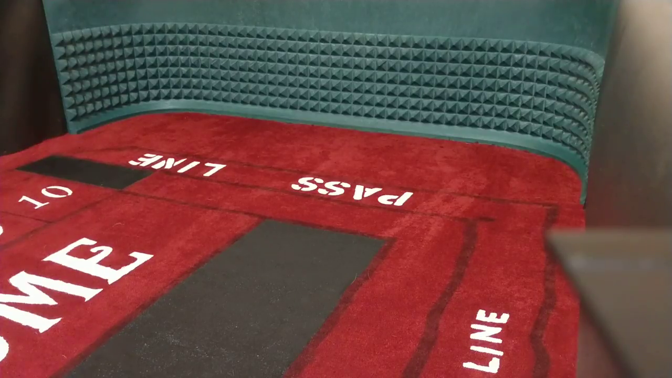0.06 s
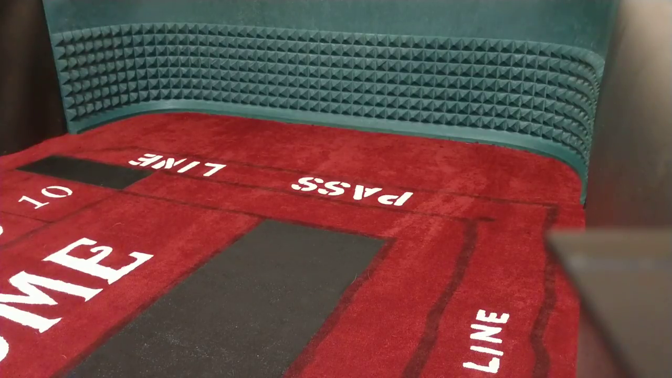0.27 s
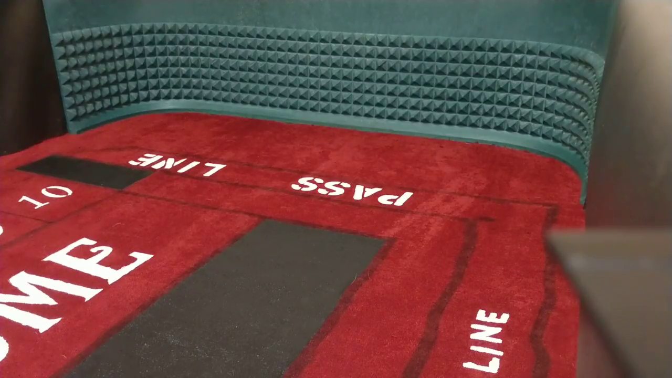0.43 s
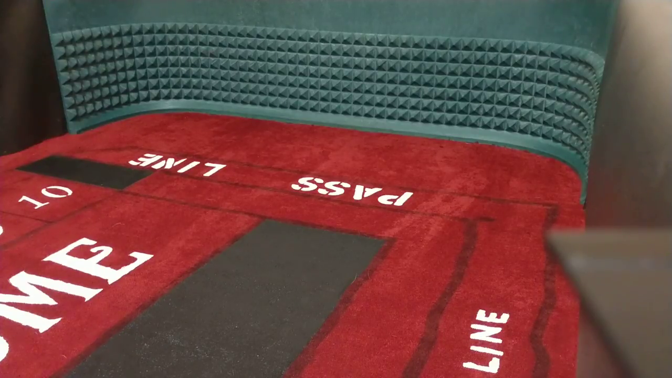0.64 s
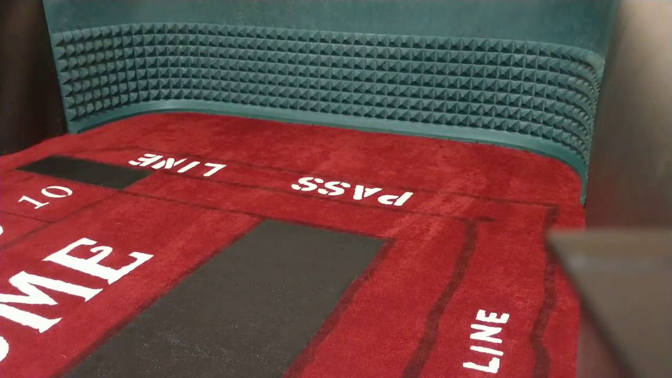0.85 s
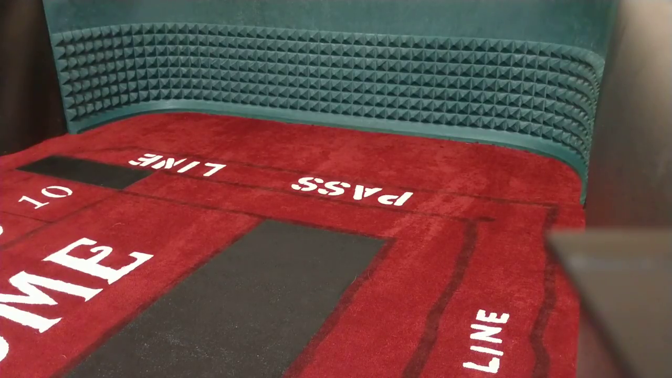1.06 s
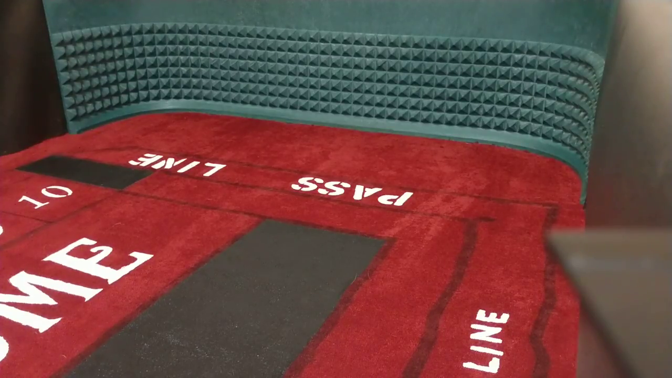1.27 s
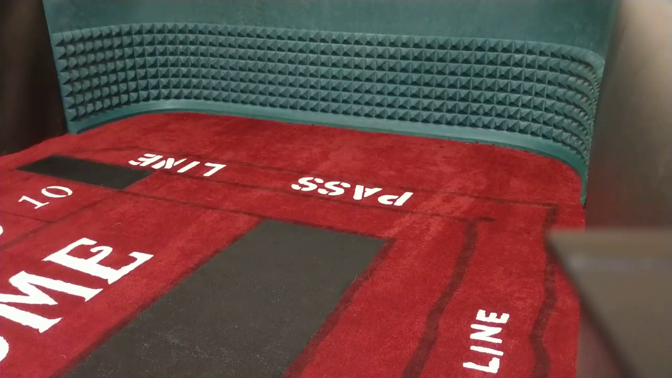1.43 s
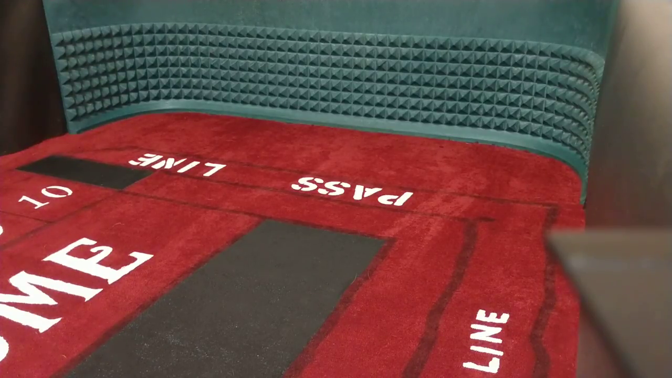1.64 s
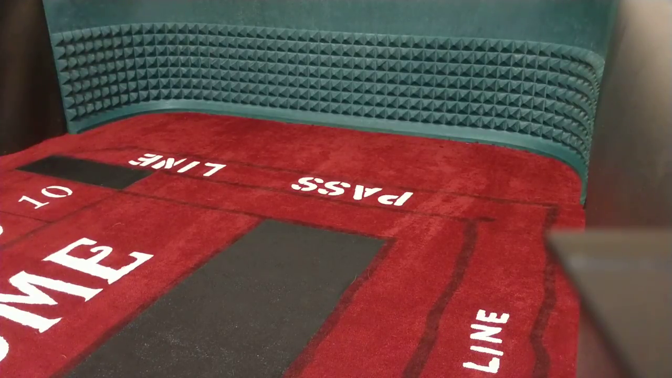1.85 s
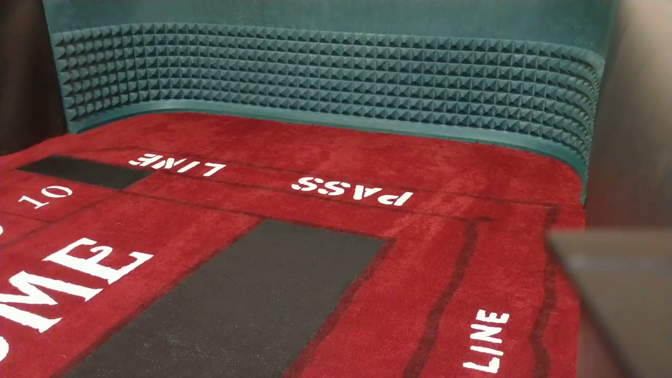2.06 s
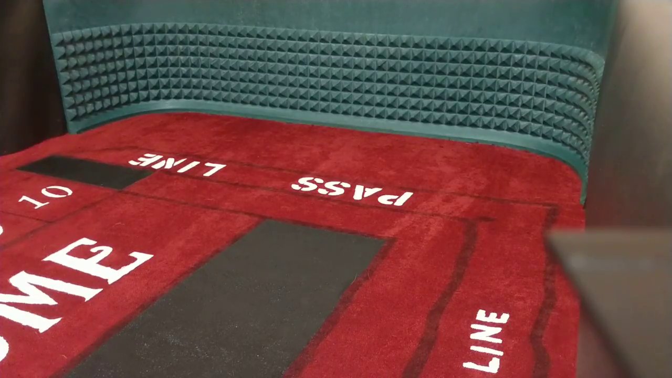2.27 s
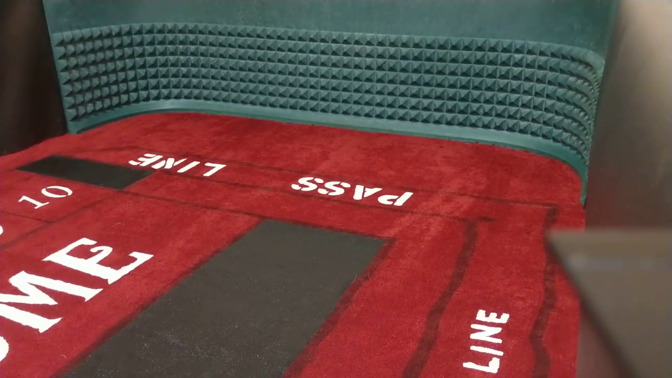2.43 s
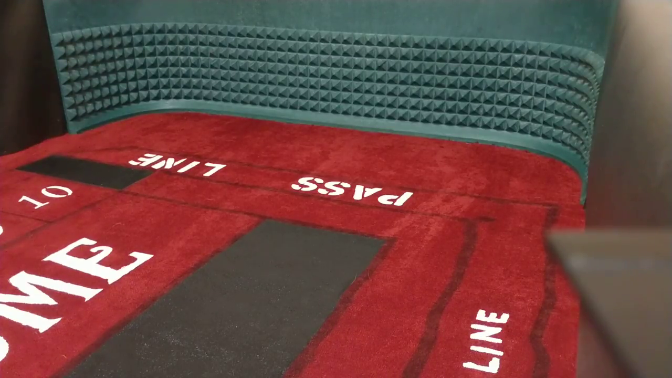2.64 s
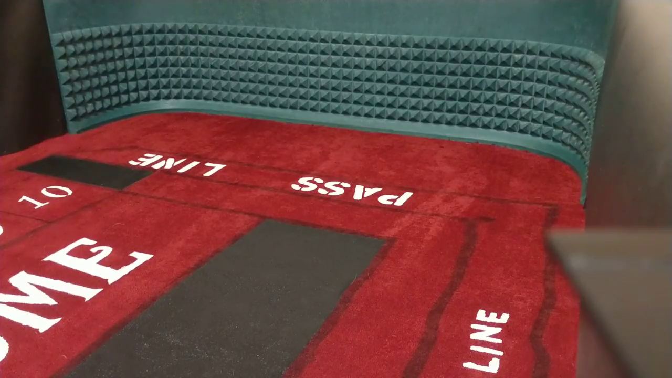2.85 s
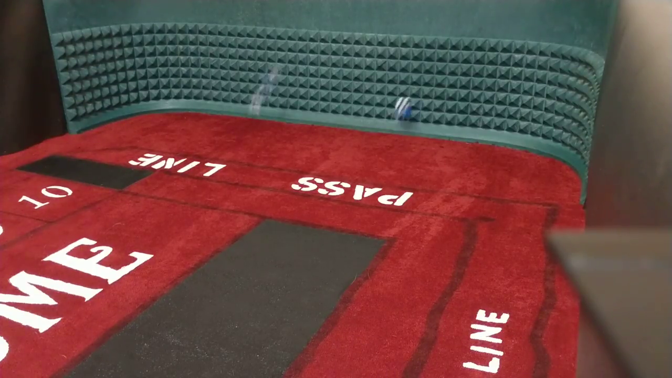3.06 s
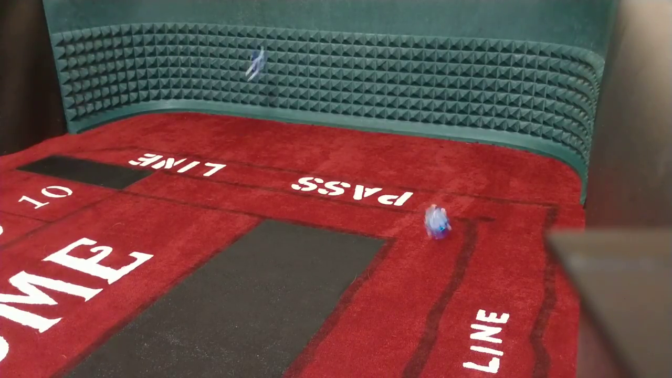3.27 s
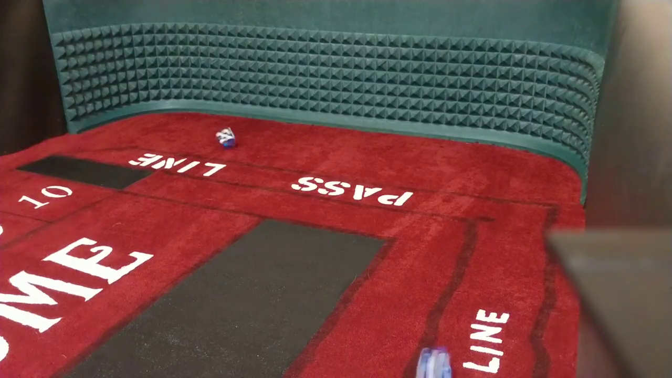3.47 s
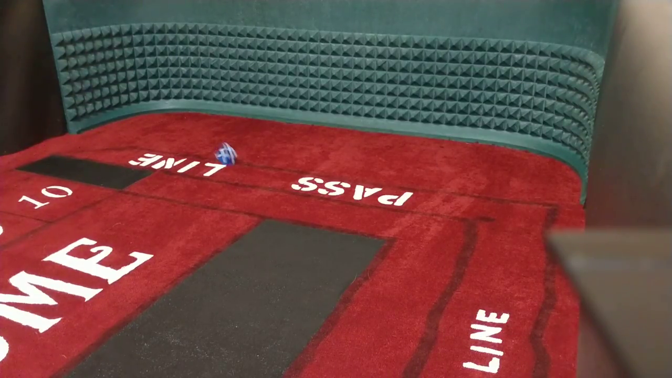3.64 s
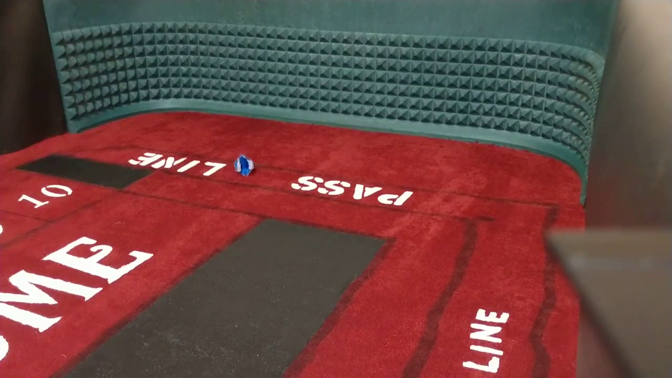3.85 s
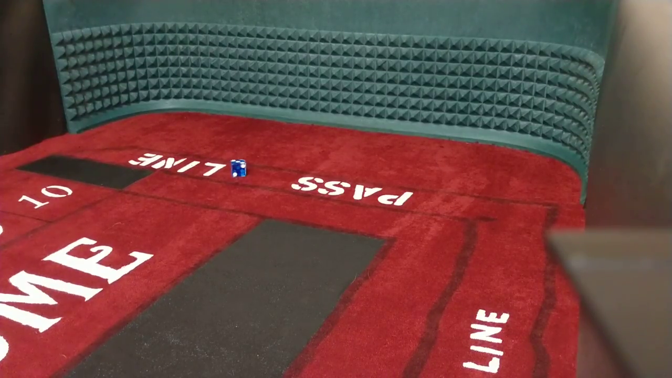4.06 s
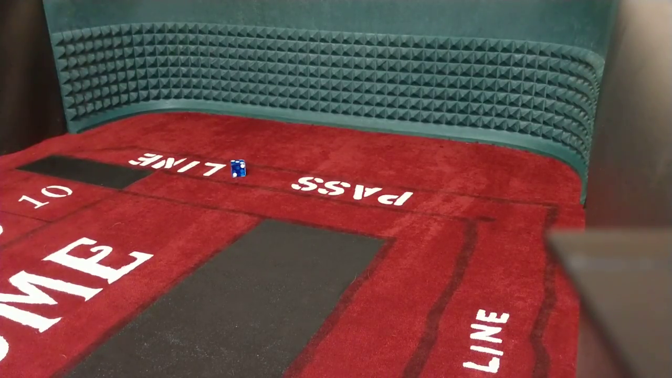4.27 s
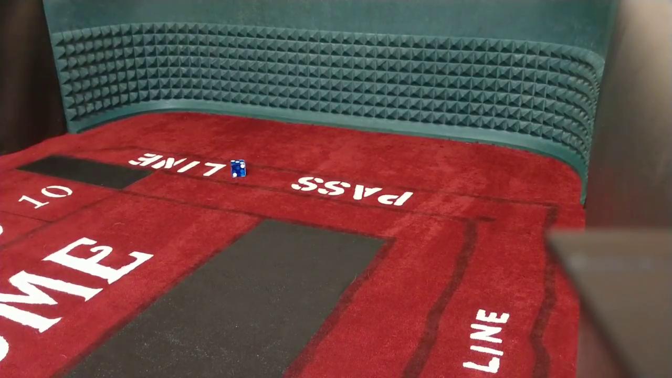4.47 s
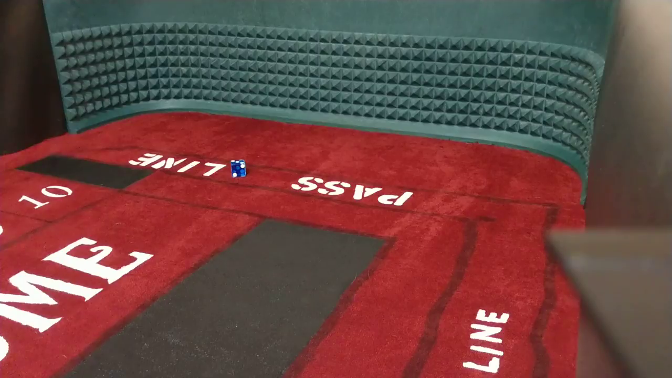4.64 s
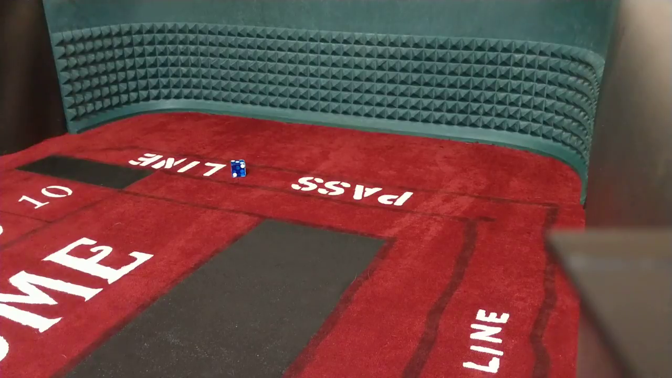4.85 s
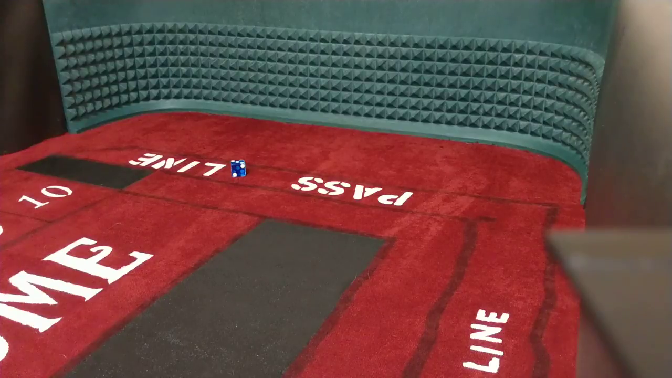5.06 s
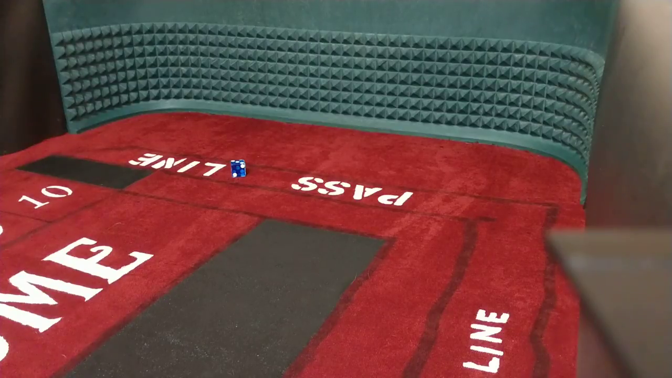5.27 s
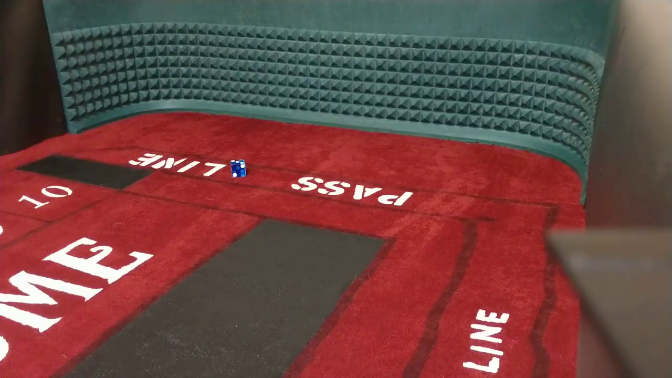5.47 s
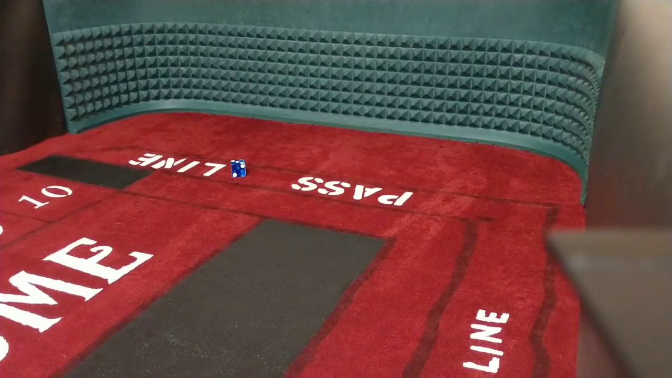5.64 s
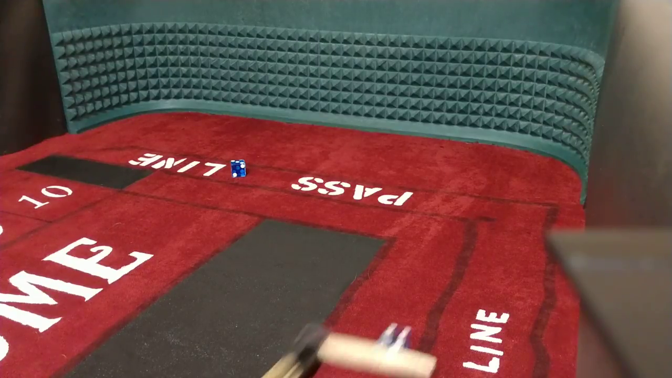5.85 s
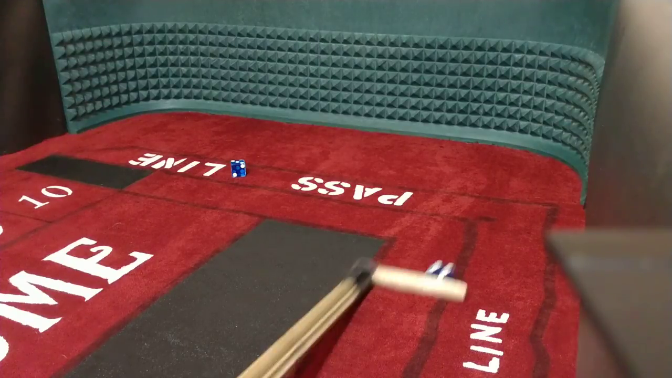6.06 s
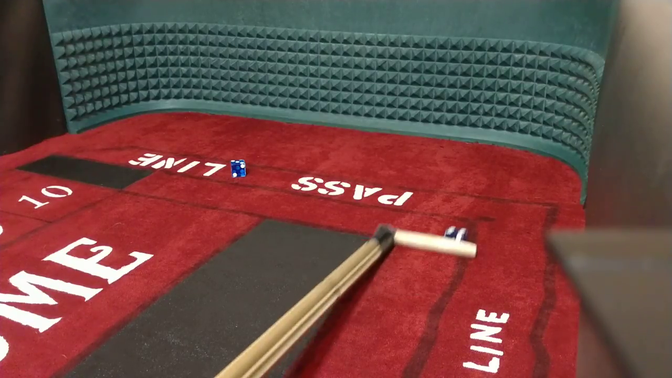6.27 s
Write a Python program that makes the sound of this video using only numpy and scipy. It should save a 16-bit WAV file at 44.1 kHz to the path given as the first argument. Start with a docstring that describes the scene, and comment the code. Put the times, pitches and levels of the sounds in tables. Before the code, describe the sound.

A quiet indoor room with steady airy ventilation, low hum and a very thin high whine. After about three seconds two dice strike a felt-covered table with a loud, hard knock, clack off the end wall and tumble in smaller, softening knocks. Soft cloth brushes follow, then a wooden stick rustles over the felt and taps a die. Close stereo microphone, impacts mostly left, short boxy echoes.

```python
"""A room with a felt-covered gaming table, heard by a close pair of microphone ports that widens the stereo.
Ventilation (shaped noise), hum and two whining picture tubes (beating sines) go on throughout; cloth is brushed.
Two dice hit the felt hard, clack off the end wall and tumble to rest: filtered pushes and ticks, board modes, echoes.
A wooden stick knocks the felt, slides out with a rustle (swelling noise) and taps a die (ringing ticks).
The first landing makes the microphone's limiter duck; it recovers slowly."""
import sys
import numpy as np
from scipy import signal
from scipy.fft import rfft, irfft
from scipy.io import wavfile
from scipy.ndimage import uniform_filter1d, minimum_filter1d

SR = 44100
rng = np.random.default_rng(int(sys.argv[2]) if len(sys.argv) > 2 else 0)


def to_wav(s):
    """Save 16-bit WAV."""
    ch = np.atleast_2d(s).T  # columns
    pcm = np.round(np.clip(ch, -1, 1) * 32767)  # PCM
    wavfile.write(sys.argv[1], SR, pcm.astype(np.int16))


N = 278094
T = np.arange(N) / SR   # s


def from_db(db):
    """Decibels to gain."""
    return 10 ** (np.asarray(db) / 20)


def in_time(rows):
    """Read a table over time: one curve per column, joined by straight lines."""
    s, *columns = np.transpose(rows)
    return np.array([np.interp(T, s, column) for column in columns])


def at_hz(points, hz):
    """Read a table on a log-frequency axis."""
    f, value = np.transpose(points)
    return np.interp(np.log(np.maximum(hz, 1)), np.log(f), value)


def cut(x, hz, kind, order=2):
    """Causal Butterworth filter."""
    return signal.sosfilt(signal.butter(order, hz, kind, fs=SR, output="sos"), x)


def late(x, samples):
    """Delay along time."""
    silence = np.zeros_like(x[..., :samples])
    return np.concatenate([silence, x[..., :x.shape[-1] - samples]], axis=-1)


def add(out, s, sound):
    """Mix a sound in at a time in seconds."""
    i = round(s * SR)
    out[i:i + len(sound)] += sound[:N - i]


def mode(t, hz, t60):
    """A struck resonance: a sine that decays by 60 dB in t60 seconds."""
    return np.sin(2 * np.pi * hz * t) * from_db(-60 * t / t60)


def drift(hz):
    """Slow chance below a cut-off, with a spread of 1."""
    slow = cut(rng.standard_normal(N + SR), hz, "low")[SR:]   # the filter settles first
    return slow / slow.std()


def swell(s, db, half_s):
    """A bell-shaped rise and fall of gain."""
    return from_db(db) * np.exp(-np.minimum(((T - s) / half_s) ** 2, 50))


def noise(spectrum, alike=0):
    """Noise at the two ports: a shared and an opposed part give the density and correlation asked for."""
    gain = from_db(at_hz(spectrum, np.fft.rfftfreq(N, 1 / SR))) * np.sqrt(SR) / 2
    mid, side = rfft(rng.standard_normal((2, N))) * gain
    shared = np.sqrt(1 + alike) * mid
    opposed = np.sqrt(1 - alike) * side * [[1], [-1]]
    return irfft(shared + opposed, N)


# ventilation in the room, before it is widened and its tone coloured: f/Hz, level/dB per Hz
AIR = [(25, -83), (50, -72.5), (85, -80.5), (135, -71.5), (170, -69), (250, -73.5), (350, -74.5),
       (700, -78.5), (1000, -88.5), (1250, -88), (1800, -99.5), (2700, -102), (4500, -109), (13000, -115)]
# likeness of that air at the two ports: f/Hz, correlation
LIKENESS = [(50, 0), (90, 0), (250, 0.52), (700, 0.4), (1800, 0), (12000, 0)]


def ventilation():
    """Steady rush of air, partly alike at the two ports."""
    return noise(AIR, at_hz(LIKENESS, np.fft.rfftfreq(N, 1 / SR)))


def tone(hz, waver):
    """A sine of rms 1 whose phase wanders (radians per root second)."""
    wander = waver * np.cumsum(rng.standard_normal(N)) / np.sqrt(SR)
    return np.sqrt(2) * np.sin(2 * np.pi * (hz * T + rng.random()) + wander)


# fan and mains hum in the room: f/Hz, left level/dB rms, right level/dB rms
HUM = [(52.5, -76, -88), (96, -78, -92), (120.6, -58.5, -79), (128.6, -60.5, -71.5), (194.1, -65.5, -63),
       (191.6, -52, -49.5), (240.6, -65, -54)]
# line whine of two picture tubes, beating: f/Hz, relative level/dB
TUBES = [(15734.2, 0), (15747.1, -4.5)]
# loudness of the whine on the left, before the level flutters: t/s, level/dB
WHINE = [(0, -49), (3.7, -51), (4.5, -47), (6.3, -48.5)]
WHINE_RIGHT_DB = -4   # right side relative to left


def appliances(flutter_db=1.5, flutter_hz=4):
    """Fans hum low; the picture tubes whine very high and beat; the level flutters slightly, more on the right."""
    hum = sum(from_db([[left_db], [right_db]]) * tone(hz, waver=2.14) for hz, left_db, right_db in HUM)
    whine = sum(from_db(db) * tone(hz, waver=0.46) for hz, db in TUBES)
    flutter = flutter_db * np.array([drift(flutter_hz) / 2, drift(flutter_hz)])
    whine_db = in_time(WHINE) + [[0], [WHINE_RIGHT_DB]] + flutter
    return hum + from_db(whine_db) * whine


# microphone hiss: f/Hz, level/dB per Hz
HISS = [(1000, -108), (12000, -106)]


def hiss():
    """The microphone's own noise, independent at the two ports."""
    return noise(HISS)


# spectrum of the swish, before it swells: f/Hz, level/dB per Hz
SWISH = [(1500, -104), (3200, -100), (4500, -100), (8000, -98), (11000, -98), (13000, -97.5), (16000, -92)]
# spectrum of the rub, before it swells: f/Hz, level/dB per Hz
RUB = [(110, -80), (220, -76), (400, -77.5), (800, -80), (1150, -86.5), (2000, -100), (4000, -112)]
# short swishes of something brushing cloth: t/s at the peak, gain/dB, half length/s
SWISHES = [(2.573, 0.5, 0.011), (3.40, -1, 0.04), (3.966, 3, 0.016), (4.075, 1.5, 0.062), (4.294, 2, 0.038),
           (4.898, 4.5, 0.0066)]
# the stick presses harder twice and the rubbing resonates: t/s at the peak, gain/dB, half length/s, f/Hz
PUSHES = [(5.512, 5.5, 0.082, 817), (5.815, 6.5, 0.1, 710)]
# the stick slides out in one long stroke that swells and fades
STROKE_S, STROKE_HALF_S, STROKE_SWISH_DB, STROKE_RUB_DB = 5.75, 0.79, 4, 4


def brushing_and_stick(grain_db=1.54, grain_hz=50, far_port_db=-12, resonance_db=-50.0, width_hz=45):
    """Brushed cloth swishes; sliding wood swishes and rubs, unevenly as it catches, resonating when pushed."""
    strokes = swell(STROKE_S, STROKE_SWISH_DB, STROKE_HALF_S) + sum(swell(*row) for row in SWISHES)
    swish = strokes * noise(SWISH, alike=0.087)
    pressure, resonance = swell(STROKE_S, STROKE_RUB_DB, STROKE_HALF_S), 0
    for s, db, half_s, hz in PUSHES:
        push, phase = swell(s, db, half_s), 2 * np.pi * hz * T
        pressure = np.hypot(pressure, push)
        # chance on both quadratures makes a narrow noise band around the resonance
        band = drift(width_hz) * np.cos(phase) + drift(width_hz) * np.sin(phase)
        resonance = resonance + from_db(resonance_db) * push * band
    rub = pressure * noise(RUB, alike=0.18) + resonance
    grain = from_db(grain_db * drift(grain_hz))
    return grain * (swish + rub) * from_db([[0], [far_port_db]])


# knocks on the felt: dice landing, and later the stick being set down or lifted;
# levels as at the near port before echoes, board and widening:
# t/s, peak level/dB, contact time/ms, level/dB that this spot passes to board and walls
FELT_KNOCKS = [(3.1340, 14, 1.187, -0.5), (3.17, -9, 0.63, 0), (3.215, -13, 1.12, 2),
               (3.367, -19.5, 1.44, 3.5), (3.4690, -13.5, 1.53, 5.5), (3.6990, -17.5, 1.3, 1),
               (3.7101, -7, 1.06, 1), (3.7815, -9, 1.19, 2), (3.956, -7, 1.09, 2.5),
               (4.2582, -13, 1.24, -0.5), (4.8950, -16, 1.4, 5), (5.0256, -25.5, 1.83, -0.5),
               (5.1312, -25, 0.93, 2.5)]
KNOCK_PERIOD, KNOCK_KEPT = 1.34, 0.15   # rocking period in contact times, share kept by each rebound


def felt_knocks():
    """Each knock rocks briefly, more slowly the longer the contact."""
    rows = []
    for s, db, contact_ms, passed_db in FELT_KNOCKS:
        rock_hz = 1e3 / (KNOCK_PERIOD * contact_ms)
        rows.append((s, db, contact_ms, rock_hz, KNOCK_KEPT, passed_db))
    return rows


# the last die rolls over its edges to rest, levels as for the knocks: t/s, peak level/dB
TUMBLES = [(3.8601, -2.5), (4.0150, -10), (4.0834, -12.5), (4.0973, -5), (4.153, -19), (4.1656, -8),
           (4.2182, -21), (4.2446, -17.5)]
# as the roll slows, its touches get longer, it rocks more slowly and it shakes the board less
ROLL_CONTACT_MS, ROLL_SOFTENS_MS_PER_ROOT_S = 0.98, 1.66
ROLL_ROCK_HZ, ROLL_SAG_HZ_PER_S = 772, 355
ROLL_KEPT, ROLL_PASSED_DB, ROLL_FADE_DB_PER_S = 0.66, -1.5, 13.5   # share kept by each rebound, then dB


def roll():
    """The rolling die loses speed: each tumble is duller and rocks more slowly than the one before."""
    s, db = np.transpose(TUMBLES)
    age = s - s.min()
    contact_ms = ROLL_CONTACT_MS + ROLL_SOFTENS_MS_PER_ROOT_S * np.sqrt(age)
    rock_hz = ROLL_ROCK_HZ - ROLL_SAG_HZ_PER_S * age
    passed_db = ROLL_PASSED_DB - ROLL_FADE_DB_PER_S * age
    return list(zip(s, db, contact_ms, rock_hz, [ROLL_KEPT] * len(s), passed_db))


def frame(blows, hz=56, t60=0.11, level_db=-41):
    """Only a hard blow presses through the felt and shakes the table frame: the push grows as the cube."""
    ring = mode(T[:SR // 3], hz, t60) * 2 * np.pi * hz / SR
    return from_db(level_db) * signal.fftconvolve(np.abs(blows) ** 3, ring)[:N]


# colour of the echoes between the table walls: f/Hz, relative level/dB
TUB = [(100, 6.5), (190, -3.5), (260, 12), (340, -0.5), (480, -3), (740, 0.5), (1050, 7.5), (1400, -9),
       (1800, 6), (3000, 2), (12000, -0.5)]
# how long those echoes last: f/Hz, t60/s
TUB_T60 = [(150, 0.38), (700, 0.098), (2000, 0.16), (10000, 0.22)]


def echoes(x, level_db, room_db, room_t60=0.18, build_s=0.00053):
    """Dense reflections from the table walls, then a fainter tail from the room, as decaying noise bands."""
    t = T[:SR // 2]
    white, response = rng.standard_normal((2, 2, len(t))), 0
    edges = np.geomspace(90, 17000, 16)
    for k, (low, high) in enumerate(zip(edges, edges[1:])):
        hz = np.sqrt(low * high)
        walls = from_db(level_db - 60 * t / at_hz(TUB_T60, hz))
        room = from_db(room_db - 60 * t / room_t60)
        decay = walls + room
        band = cut(white[k % 2], [low, high], "band") * decay
        # each band carries its due energy
        share = np.sum(decay ** 2) * (high - low) * 2 / SR
        band = band * np.sqrt(share / np.sum(band ** 2, axis=1, keepdims=True))
        response = response + band * from_db(at_hz(TUB, hz))
    response = response * (1 - np.exp(-(t / build_s) ** 2))
    return signal.fftconvolve(x[None], response, axes=1)[:, :N]


# resonances of the board under the felt: f/Hz, relative level/dB, t60/s
BOARD = [(140.3, -10, 0.19), (179, -23.5, 0.19), (289.4, -7, 0.062), (374, -25, 0.23), (450.7, -21, 0.12),
         (585, -32.5, 0.08), (651.5, -33.5, 0.12), (738, -23.5, 0.031)]
ROCK_UNEVEN = 0.059   # spread of the time between touches, as a share of the period


def knocks(radiation_hz=330, far_port_db=-16, board_db=-0.5):
    """A knock is a few soft, rocking pushes in quick succession, which also set the board ringing."""
    t, direct, passed = T[:SR // 20], np.zeros(N), np.zeros(N)
    for s, level_db, contact_ms, rock_hz, kept, passed_db in felt_knocks() + roll():
        touches, turn = np.zeros(len(t)), np.arange(6)
        periods = np.cumsum(rng.normal(1, ROCK_UNEVEN, len(turn)))
        places = np.round((periods - periods[0]) * SR / rock_hz).astype(int)
        touches[places] = kept ** turn
        push = cut(touches, 1e3 / contact_ms, "low", order=5)   # the felt blunts every touch
        wave = -cut(push, radiation_hz, "high")                 # slow motion radiates poorly
        wave = from_db(level_db) * wave / np.abs(wave).max()
        add(direct, s, wave)
        add(passed, s, from_db(passed_db) * wave)
    ring = 0
    for hz, db, t60 in BOARD:
        ring = ring + from_db(db + board_db) * mode(T[:SR // 3], hz, t60) * 2 * np.pi * hz / SR
    board = signal.fftconvolve(passed, ring)[:N] + frame(passed)
    return (direct + board) * from_db([[0], [far_port_db]]) + echoes(passed, level_db=-33, room_db=-57)


def clacks(hits, brightness, passed_db, ring_t60, ring_db, body_hz=450, far_port_db=-10):
    """Hard contact: a sharp tick with a brief ring, scattered by the walls; the higher the ring, the brighter."""
    t, direct = T[:SR // 20], np.zeros(N)
    for s, level_db, ring_hz in hits:
        dulled = cut(signal.unit_impulse(len(t)), brightness * ring_hz, "low")
        tick = cut(dulled, body_hz, "high", order=1)
        ring = from_db(ring_db) * mode(t, ring_hz, ring_t60)
        add(direct, s, from_db(level_db) * (tick / tick.max() + ring))
    scattered = echoes(from_db(passed_db) * direct, level_db=-28.5, room_db=-77)
    return direct * from_db([[0], [far_port_db]]) + scattered


# a die clacks on the end wall or through the felt, as at the near port before echoes and widening:
# t/s, peak level of the tick/dB, ring f/Hz
DIE_CLACKS = [(3.1346, -16, 2170), (3.1712, -10, 1950), (3.1748, -20, 2840), (3.7098, -29, 3000),
              (3.7823, -27, 2800), (3.86, -31, 1580)]
DIE_BRIGHTNESS, DIE_PASSED_DB = 1.03, 2   # top of the tick over its ring; dB passed to the walls


def die_clacks():
    """Hard die contacts, with a faint ring under the tick."""
    return clacks(DIE_CLACKS, DIE_BRIGHTNESS, DIE_PASSED_DB, ring_t60=0.006, ring_db=-35.5)


# the wooden stick taps the table and the die, levels as for the clacks:
# t/s, peak level of the tick/dB, ring f/Hz
STICK_TAPS = [(5.4481, -25, 900), (5.8681, -30.5, 1900), (5.9659, -31, 1290), (6.035, -19.5, 3540),
              (6.0770, -27.5, 1350), (6.1490, -19, 2050), (6.1525, -31, 3080), (6.2146, -23, 2910)]
STICK_BRIGHTNESS, STICK_PASSED_DB = 0.86, -1.5   # top of the tick over its ring; dB passed to the walls


def stick_taps():
    """Light wooden contacts, with a stronger ring under the tick."""
    return clacks(STICK_TAPS, STICK_BRIGHTNESS, STICK_PASSED_DB, ring_t60=0.0056, ring_db=-16.5)


PORT_LAG = 19      # samples of travel between the ports
CROSSFEED = 0.62   # share of the opposite port taken away


def widen(ports):
    """Each channel is its own port minus the delayed opposite one."""
    return ports - CROSSFEED * late(ports[::-1], PORT_LAG)


# fixed tone colour, one lift and two dips: f/Hz, Q, level/dB
TONE_COLOUR = [(2530, 3.1, 4), (2200, 8, -14.5), (4100, 6.2, -3)]


def coloured(x):
    """Fixed tone colour: a lift near 2.5 kHz, dips near 2.2 and 4.1 kHz, by resonant filters in series."""
    for hz, q, db in TONE_COLOUR:
        x = x + (from_db(db) - 1) * signal.lfilter(*signal.iirpeak(hz, q, fs=SR), x)
    return x


def scene():
    """Room, dice and stick, heard through the microphone."""
    table = knocks() + die_clacks() + stick_taps()
    at_ports = ventilation() + brushing_and_stick() + table
    return coloured(widen(at_ports)) + appliances() + hiss()


CUTOFF_HZ = 16000   # the treble ends here


def record(dry, ceiling_db=1.7, release_db_per_s=15):
    """A look-ahead limiter ducks at once and recovers slowly; the top is cut."""
    level_db = 20 * np.log10(np.abs(dry).max(axis=0) + 1e-9)
    over_db = np.maximum(level_db - ceiling_db, 0)
    # hold the largest excess, let go at a steady rate
    held_db = np.maximum.accumulate(over_db + release_db_per_s * T) - release_db_per_s * T
    gain_db = uniform_filter1d(minimum_filter1d(-held_db, size=129), size=65)
    top_cut = signal.ellip(10, .1, 80, CUTOFF_HZ, fs=SR, output="sos")
    return signal.sosfilt(top_cut, dry * from_db(gain_db))


dry = scene()
out = record(dry)
to_wav(out)
```